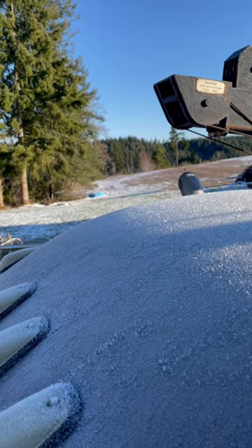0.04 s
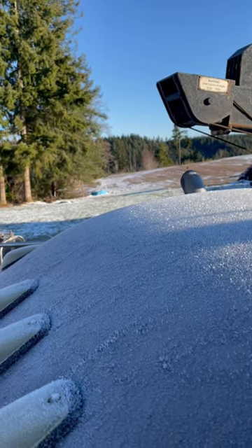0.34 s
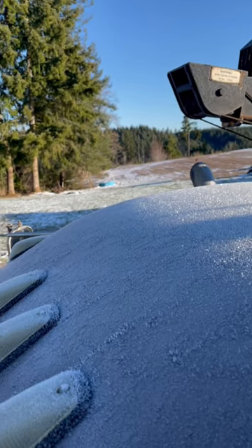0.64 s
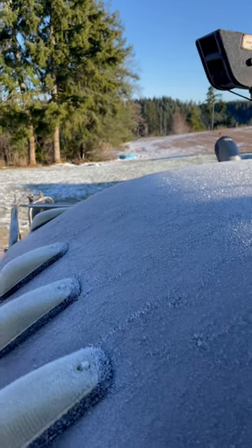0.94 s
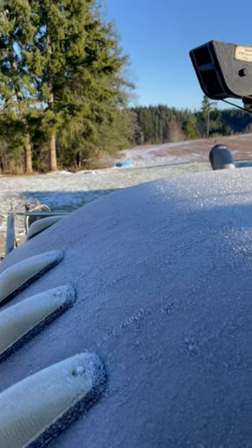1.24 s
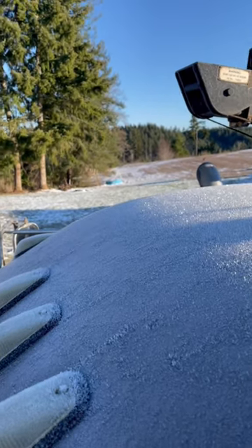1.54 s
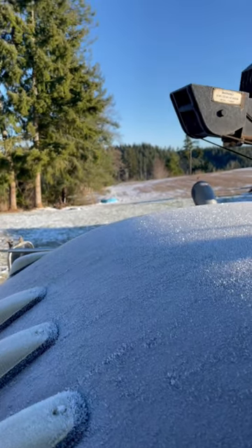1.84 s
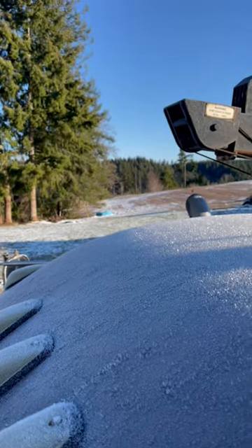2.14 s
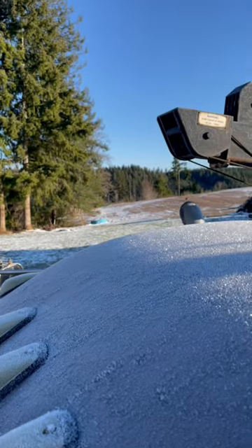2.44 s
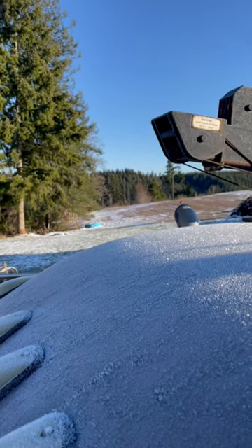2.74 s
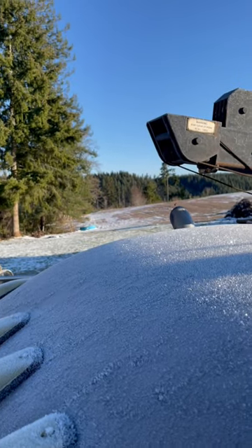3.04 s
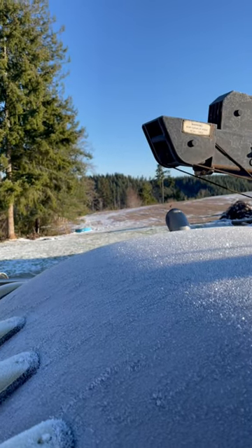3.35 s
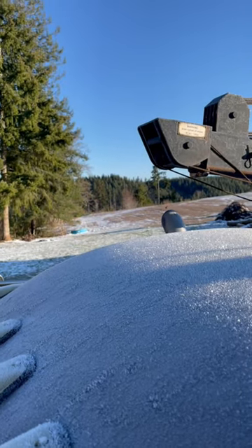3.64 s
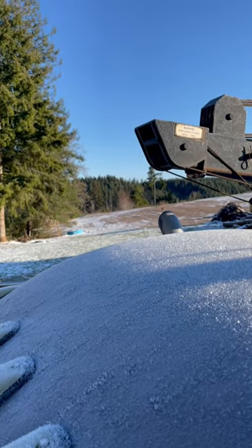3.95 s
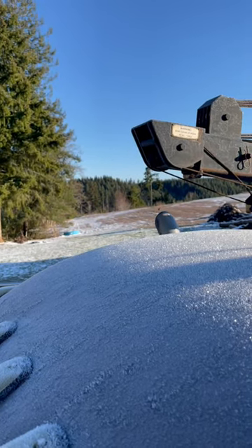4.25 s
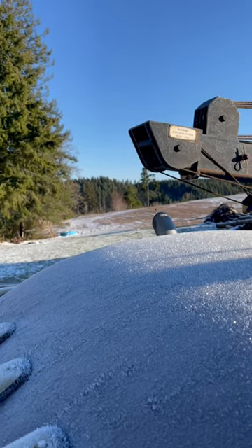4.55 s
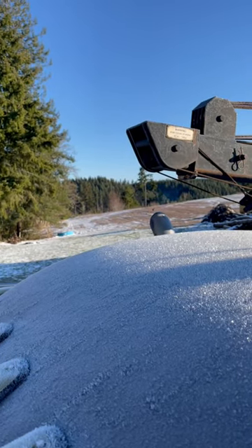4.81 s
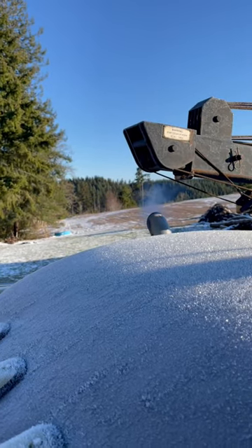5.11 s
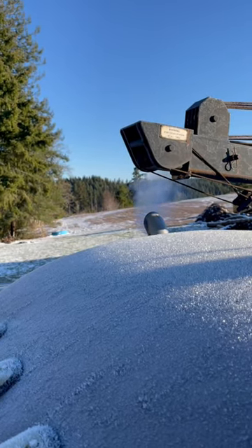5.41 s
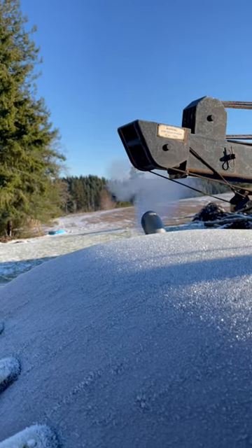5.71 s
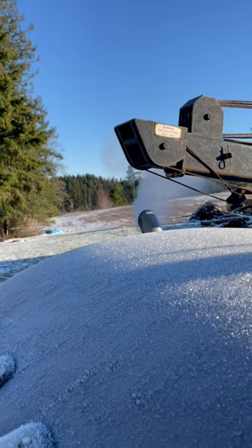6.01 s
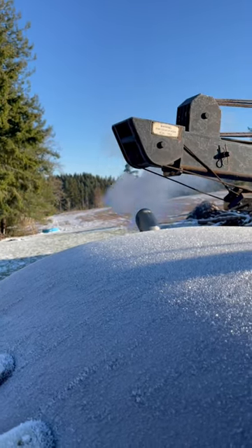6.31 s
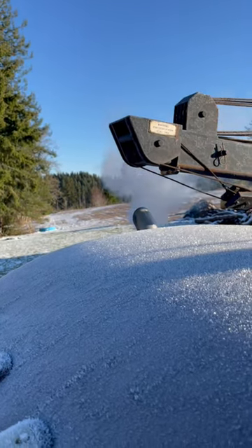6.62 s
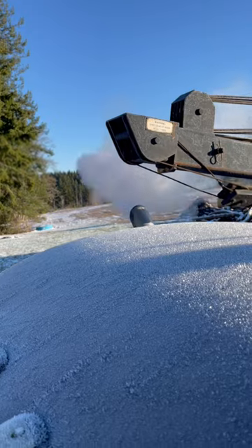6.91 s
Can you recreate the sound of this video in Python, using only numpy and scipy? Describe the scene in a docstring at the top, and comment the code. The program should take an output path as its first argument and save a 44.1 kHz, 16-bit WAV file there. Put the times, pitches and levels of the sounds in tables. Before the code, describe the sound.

Heard from just behind the hood outdoors, a starter motor turns over a big cold diesel, its whine dragging on each compression amid a metallic rattle and soft exhaust chuffs. The engine gives a few weak coughs midway and keeps cranking. Near the end it starts to catch, firing in irregular clusters of low booms, sharp knocks and short hisses as the starter speeds up and slows.

```python
"""Outdoors, behind the frosted hood of a heavy diesel that is being cranked from cold.
The starter gears whine and clatter, dragging on every compression, over the rumble of the exhaust stack.
A few lone cylinders fire around three seconds in. After five seconds come three bunches of booms,
as gas is shoved up the stack, with hard combustion knocks on the block and spits of hiss."""
import sys
import numpy as np
from scipy import signal
from scipy.fft import rfft, irfft
from scipy.io import wavfile
from scipy.ndimage import uniform_filter1d

SR = 44100
rng = np.random.default_rng(int(sys.argv[2]) if len(sys.argv) > 2 else 0)


def output_pcm(signal):
    """Save a mono or channel-first signal as 16-bit PCM at the path in sys.argv[1].

    Samples are clipped to [-1, 1] before scaling.
    """
    pcm = np.clip(np.atleast_2d(signal).T, -1, 1) * 32767
    wavfile.write(sys.argv[1], SR, np.round(pcm).astype(np.int16))


N = 316197
TIME, FREQS = np.arange(N) / SR, np.fft.rfftfreq(N, 1 / SR)
AGE = TIME[:SR // 2]  # seconds into a single hit

# The cranking rhythm. Each row: compression time in seconds, whine in dB, run-up tooth-mesh rate in Hz.
COMPRESSIONS = [(-.025, 5, 409), (0.095, 1.5, 408.6), (.222, -1.5, 409), (.346, 0, 411.5),
                (0.468, -4.5, 414.5), (.595, 0, 407.3), (.713, -2, 408), (0.846, 0.5, 404.6),
                (0.963, -3, 410.2), (1.096, -1.5, 404.5), (1.223, -3, 416.2), (1.346, 1, 406.4),
                (1.462, -1.5, 414.8), (1.59, 0, 408), (1.709, 0, 411.5), (1.826, -3, 411.4),
                (1.959, 1, 407.6), (2.086, -3, 413), (2.208, -1.5, 411.3), (2.329, -3.5, 414),
                (2.456, 1, 402.5), (2.576, -2.5, 408.4), (2.715, 3, 461), (2.812, 2.5, 458),
                (2.922, -4.5, 447), (3.03, 1, 438.4), (3.146, 2.5, 426.4), (3.275, 2, 449.8),
                (3.378, 2.5, 446.2), (3.494, -2, 441.2), (3.61, 1, 424.4), (3.726, 2.5, 415.5),
                (3.848, 0, 413.5), (3.973, 1, 406), (4.103, 1.5, 432), (4.222, -4.5, 420.8),
                (4.333, -4, 415), (4.456, 3.5, 408), (4.576, -1.5, 409.4), (4.709, -3, 434.5),
                (4.822, 4, 444.5), (4.935, -3, 446), (5.047, -1.5, 469.3), (5.148, 0.5, 466),
                (5.255, 4.5, 445), (5.365, -7, 479), (5.445, -9, 578.5), (5.528, 5, 552), (5.628, 2, 509.6),
                (5.741, 5, 453.5), (5.856, 1.5, 428), (5.969, 0, 413), (6.1, -2, 446.3), (6.181, 1.5, 564),
                (6.27, 7, 540), (6.373, 1.5, 490), (6.492, 2.5, 443.4), (6.61, -7.5, 432), (6.7, -16, 536),
                (6.772, -21, 592), (6.848, 5, 570), (6.94, 6, 560), (7.027, 9.5, 550), (7.12, 6, 530),
                (7.22, -6, 500)]
# The shape of one stroke. Each row: position from 0 to 1, cold tooth-mesh rate in Hz,
# weight of any extra speed, tooth force in dB, clatter in dB.
STROKE_SHAPE = [(0, 388.6, 0.12, -1.5, 2.5), (0.079, 371.7, 0.1, -0.5, 1.5), (.16, 347.5, 0.25, 1, 0.5),
                (0.281, 313, 0.45, -1.5, 2), (0.418, 303.9, 0.68, -4, 0), (0.56, 369.4, 1.65, -10, -0.5),
                (.68, 399.7, 1.25, -3, 0), (.79, 410.6, 0.95, -13.5, 0.5), (.88, 402.6, 0.62, 0.5, 0)]
# Gear overtones. Each row: multiple of the tooth-mesh rate, level in dB.
GEAR_OVERTONES = [(3, -52.5), (4, -55), (5, -57), (6, -56), (7, -62)]
# Each row: firing time in seconds, boom in dB, boom pitch in Hz, swell in seconds, gas rush in dB.
CYLINDER_FIRINGS = [(2.675, -21.5, 70.4, 0.032, -36.5), (2.86, -28, 78.57, 0.019, -56),
                    (3.32, -26, 71, 0.031, -45), (5.023, -25, 69.26, 0.023, -28.5),
                    (5.099, -25, 92, 0.018, -35), (5.341, -16.5, 90.6, 0.058, -20.5),
                    (5.432, -16, 55, 0.047, -25), (5.595, -22.5, 65.4, 0.026, -33.5),
                    (5.713, -25, 61.15, 0.037, -39), (6.088, -15, 65.8, 0.052, -22.5),
                    (6.148, -18.5, 94, 0.028, -25), (6.233, -26.5, 61.5, 0.061, -30),
                    (6.598, -13, 62.3, 0.041, -22), (6.715, -15.5, 74, 0.017, -27.5),
                    (6.772, -13, 68.1, 0.038, -25), (6.85, -32, 103.6, 0.018, -23.5),
                    (6.897, -20, 95.6, 0.012, -26), (6.94, -26, 89.9, 0.022, -43),
                    (7.041, -27.5, 66.8, 0.045, -43)]
# Each row: start in seconds, knock in dB, hiss in dB, swell in seconds.
HARD_KNOCKS = [(2.201, -41, -76, 0.0029), (2.78, -46, -66, 0.03), (2.888, -44, -62, 0.014),
               (3.26, -43, -68, 0.017), (3.365, -51, -74, .02), (4.703, -40, -70, 0.0038),
               (4.819, -37, -76, 0.003), (5.389, -30.5, -74, 0.012), (5.442, -53, -51, 0.01),
               (5.64, -44, -59, 0.013), (6.098, -34, -43, .0015), (6.133, -30.5, -64, 0.0098),
               (6.15, -50, -47, 0.014), (6.6413, -29, -34.5, 0.0008), (6.643, -25, -52, 0.0055),
               (6.689, -42, -49, 0.013), (6.711, -25.5, -62, 0.0092), (6.738, -35.5, -51, 0.015),
               (6.772, -24, -65, 0.0097), (6.822, -19, -38.5, 0.0045), (6.833, -28, -71, 0.011),
               (7.02, -40, -53, 0.015)]

# Resonances. Each row: centre in Hz, width in Hz, level in dB.
HOUSING_MODES = [(661, 28, 11), (303.4, 16, 4.5), (1126, 62, -4.5), (1765, 45, 2.5), (1910, 62, -1),
                 (2440, 96, -2.5)]  # flywheel housing
BLOCK_MODES = [(204.6, 86, -2), (666, 8.8, -2), (1158, 13.6, 6.5), (1800, 34, 2.5), (1927, 43, 5.5),
               (2084, 27, 2), (2455, 37, 3), (2740, 26, 5), (2800, 65, 2), (4140, 140, 0)]  # iron block and its covers
CLANK_MODES = [(1760, 350, -5), (2200, 290, -6.5), (3650, 250, 10.5), (5000, 270, -17)]  # short ring of knocked metal
STACK_MODES = [(54.5, 19, 2.5), (92.1, 12.4, -1.5), (143.3, 34, -11.5), (199.7, 6.2, -4)]  # exhaust pipe
MOUTH_MODES = [(279, 33, 11), (440, 84, 10.7), (664, 63, 6.3), (870, 73, 3.7)]  # mouth of the stack

# Noise colours. Each row: frequency in Hz, relative spectral density in dB.
CLATTER_EQ = [(90, -10.5), (170, 2), (250, -0.5), (320, 2.5), (430, 0.5), (540, -3.5), (700, 1),
              (1100, -4.5), (1400, -12), (1950, -12.5), (2550, -15.5), (2950, -21), (5400, -27),
              (6500, -35.5), (7400, -62.5), (11000, -68)]  # rattling gears
RUSH_EQ = [(30, -6.5), (80, 10.5), (160, 6), (300, -6), (600, -8), (1200, -18), (2400, -21.5),
           (3500, -34.5), (6000, -38.5), (9000, -70)]  # turbulent gas in the stack
BARK_EQ = [(120, -27), (280, -3.5), (800, -5.5), (1300, -23), (3000, -69)]  # gas tearing out of the mouth
KNOCK_EQ = [(300, -3.5), (1100, 1.5), (1700, 6.5), (2400, 6.5), (3100, -3), (3800, -14), (6000, -13.5),
            (8000, -44.5), (15000, -33)]  # hard knock
HISS_EQ = [(1500, -22), (3000, 1.5), (5500, 13.5), (7500, -26), (9200, 8), (11800, 1), (13500, -12.5),
           (16000, -11)]  # bright hiss

# Stereo width. Each row: frequency in Hz, likeness of left and right from -1 to 1.
STEREO_LIKENESS = [(100, 0.98), (200, 1), (400, 0.69), (600, 0.094), (1200, 0.1), (1900, 0.77),
                   (2800, -0.53), (4000, 0.091), (4500, 0.23), (5300, 0.33), (6500, -0.22), (11000, 0.26)]
# The whine reaches the left ear late. Each row: frequency in Hz, lag in radians.
LEFT_EAR_LAG = [(450, 0.51), (800, 0.97), (1200, 0.3), (1900, 0.11), (2500, 0.24)]
# The hood shades the machinery from the left ear. Each row: frequency in Hz, left minus right in dB.
HOOD_SHADE = [(150, -1.5), (400, -2), (680, -3.5), (790, -0.5), (1300, -2.5), (1900, 1), (2700, -2),
              (4100, 0.5), (7000, 1)]


def starter_whine(turns, force, effort, squeal, groan_db=-34, octave_db=-47, note_hz=791.8):
    """Meshing teeth groan; their octave sweeps through the housing's main note and sets it ringing."""
    angle = 2 * np.pi * turns
    teeth = amp(groan_db) * (1 + .2 * wander(55)) * np.sin(angle + .5 * wander(67))
    teeth += amp(octave_db) * effort * (1 + .12 * wander(59)) * np.sin(2 * angle)
    # overtones come and go as the pinion shifts in its backlash
    for multiple, db in GEAR_OVERTONES:
        teeth += amp(db + 2 * wander(33)) * np.sqrt(2) * np.sin(multiple * angle + .77 * wander(66))
    teeth = teeth * force + squeal
    main_note = amp(25) * ring([(note_hz, 39.6, 0)]) ** 2  # steep-sided: holds the whine on one pitch
    housing = 1 + ring(HOUSING_MODES) + main_note
    blur = amp(-22) * echoes(teeth, t60=.14)[0]  # reflections under the hood smear the glides
    right = rfft(teeth + blur) * housing
    left = right * np.exp(-1j * curve(LEFT_EAR_LAG))
    return irfft(np.array([left, right]), N)


def gear_squeal(turns, stroke, extra_hz, best_extra_hz=42, range_hz=22):
    """A little above cold speed, the gears sing two clean overtones in the run-up to each compression."""
    run_up = stroke_pulse(stroke, at=.79, width=.13)
    sweet_spot = np.exp(-((extra_hz - best_extra_hz) / range_hz) ** 2)
    tones = sum(amp(db) * np.sin(multiple * 2 * np.pi * turns + .2 * wander(40))
                for multiple, db in ((4, -45.5), (5, -48)))
    return run_up * sweet_spot * tones


def gear_clatter(turns, strength, db=-34, ticks_per_s=900, tick_s=.0042, wash=.69, top_hz=12000):
    """Gear backlash and valve gear tick against the iron block, over a wash of noise."""
    ticks = (rng.random(N) < ticks_per_s / SR) * amp(3.2 * np.minimum(rng.exponential(1, N), 4)) ** 2
    power = signal.lfilter([1], [1, -np.exp(-1 / (tick_s * SR))], ticks)
    tooth_buzz = 1 + .1 * np.cos(2 * np.pi * turns)
    grains = rng.standard_normal((2, N)) * np.sqrt(power / power.mean() + wash) * tooth_buzz
    # reflections under the hood give a ribbed, metallic colour that slowly shifts
    blend = np.array([wander(5) for _ in range(3)])
    blend /= np.linalg.norm(blend, axis=0)
    grains = grains + .8 * sum(share * echoes(grains, t60=.094) for share in blend)
    flicker = amp(.5 * wander(21))
    rattle = amp(db) * colour(grains, CLATTER_EQ, BLOCK_MODES) * strength * flicker
    return irfft(rfft(rattle) / (1 + (FREQS / top_hz) ** 16), N)


def cranking_rhythm(run_up=.2464, cold_top_hz=410):
    """The starter's pace: running stroke count, whine gain, and mesh Hz gained over the cold crank."""
    times, whine_db, top_hz = np.transpose(COMPRESSIONS)
    count = np.arange(len(times))
    stroke = np.interp(TIME, times, count)
    effort = amp(np.interp(stroke, count, whine_db))
    extra_hz = np.interp(stroke + run_up, count, top_hz) - cold_top_hz
    return stroke, effort, extra_hz


def crank(stroke, extra_hz, flutter=.004, slack_db=-4, overrun_hz=80):
    """Compression brakes the crank, expansion frees it: gives mesh turns, tooth force, clatter gain."""
    position, *columns = np.transpose(STROKE_SHAPE)
    cold_hz, give, force_db, clatter_db = (
        uniform_filter1d(np.interp(stroke, position, column, period=1), size=300) for column in columns)
    mesh_hz = (cold_hz + give * extra_hz) * (1 + flutter * wander(41))
    # the gears fall slack at ignition, just before the exhaust opens
    slack = amp(slack_db * np.tanh(firing_swells(rise_s=.0091, lead_s=.046) / .13))
    # the teeth unload as the engine outruns the starter
    grip = 1 / np.sqrt(1 + (extra_hz / overrun_hz) ** 4)
    return np.cumsum(mesh_hz) / SR, amp(force_db) * slack * grip, amp(clatter_db) * slack


def exhaust_booms(sag=.055, tail_db=-11):
    """Each firing shoves gas up the stack: a boom sagging in pitch, a turbulent rush, a ragged bark."""
    boom, rush, bark = np.zeros((3, N))
    for start, boom_db, hz, rise_s, rush_db in CYLINDER_FIRINGS:
        angle = 2 * np.pi * hz * AGE * (1 - sag * np.tanh(AGE / .073))
        # the pipe's next resonance rings along, and the steepening pressure front adds the octave
        wave = np.sin(angle) + amp(-13) * np.sin(1.55 * angle) + .1 * np.sin(2 * angle)
        add(boom, start, amp(boom_db) * swell(rise_s) ** 1.56 * wave)
        add(rush, start, amp(rush_db) * swell(rise_s=.03))
        crests = (.5 + .5 * np.sin(angle)) ** 2  # gas tears out of the mouth on each crest
        add(bark, start, amp(rush_db + 1.5) * swell(rise_s=.018) * crests)
    gas = boom + rush * noise(RUSH_EQ) + bark * noise(BARK_EQ, MOUTH_MODES)
    return gas + amp(tail_db) * echoes(gas.mean(0), t60=.89)[0]


def knocks_and_hiss(stroke, loose, soft_db=-51, jet_db=-68, gust_db=-47, tail_db=-8):
    """Late-igniting fuel cracks against the block, and gas spits from the outlet."""
    blows, spits = np.zeros((2, N))
    for start, knock_db, hiss_db, rise_s in HARD_KNOCKS:
        burst = swell(rise_s) ** 3
        add(blows, start, amp(knock_db) * burst)
        add(spits, start, amp(hiss_db) * burst)
    # once the engine is loose, every stroke knocks softly
    blows += amp(soft_db) * loose * stroke_pulse(stroke, at=1, width=.37)
    knock = blows * noise(KNOCK_EQ, CLANK_MODES)
    # the outlet hisses throughout, and harder in the wake of each firing
    jet = amp(jet_db) + amp(gust_db) * firing_swells(rise_s=.062)
    sputter = amp(1.5 * wander(30))
    hiss = (spits + jet * sputter) * noise(HISS_EQ)
    return knock + hiss + amp(tail_db) * echoes(knock, t60=.22)


def stack_rumble(strength, loose, db=-35.5, loose_db=3, low_hz=42, top_hz=350):
    """Unburnt air leaves in soft chuffs that ring the stack, louder once the engine loosens."""
    chuffs = rng.standard_normal(N) * strength ** .2
    band = 1 / (1 + (low_hz / (FREQS + 1)) ** 6) / (1 + (FREQS / top_hz) ** 4)
    air = irfft(rfft(chuffs) * ring(STACK_MODES) * band, N)
    # every stroke pumps about the same amount of air
    air /= np.sqrt(uniform_filter1d(air ** 2, size=6000) + 1e-12)
    return amp(db + loose_db * loose) * air


def echoes(x, t60):
    """A tail of scattered reflections, different in each ear, falling 60 dB in t60 seconds."""
    t = TIME[:SR]
    taps = (rng.standard_normal((2, SR)) * amp(-60 * t / t60))[:, t < t60]
    return signal.oaconvolve(np.atleast_2d(x), taps / np.linalg.norm(taps[0]), axes=1)[:, :N]


def firing_swells(rise_s, lead_s=0.):
    """A swell for every firing, as strong as its boom, starting lead_s ahead of it."""
    total = np.zeros(N)
    for start, boom_db, *_ in CYLINDER_FIRINGS:
        add(total, start - lead_s, amp(boom_db) * swell(rise_s))
    return total


def stroke_pulse(stroke, at, width):
    """A bell-shaped envelope once a stroke; position and width are fractions of the stroke."""
    return np.exp(-(((stroke - at + .5) % 1 - .5) / width) ** 2)


def swell(rise_s):
    """An envelope that peaks at 1 after the rise time and dies away."""
    u = AGE / rise_s
    return u * np.exp(1 - np.minimum(u, 60))


def wander(rate_hz):
    """Smooth random modulation of rms 1."""
    coarse = TIME[::100]
    hz = np.fft.rfftfreq(len(coarse), coarse[1])
    slow = irfft(rfft(rng.standard_normal(len(coarse))) / (1 + (hz / rate_hz) ** 4), len(coarse))
    return np.interp(TIME, coarse, unit(slow))


def noise(eq, modes=()):
    """A steady bed of coloured stereo noise."""
    return colour(rng.standard_normal((2, N)), eq, modes)


def colour(pair, eq, modes):
    """Shapes two unrelated signals with EQ and resonances into stereo of rms 1, the bass centred."""
    peaks = np.sqrt(1 + sum(abs(ring([mode])) ** 2 for mode in modes))
    a, b = rfft(pair) * amp(curve(eq)) * peaks
    likeness = curve(STEREO_LIKENESS)
    mid, side = a * np.sqrt(1 + likeness), b * np.sqrt(1 - likeness)
    return unit(irfft(np.array([mid + side, mid - side]), N))


def ring(modes):
    """The frequency response of a bank of resonances."""
    return sum(amp(db) / (1 + 2j * (FREQS - hz) / width) for hz, width, db in modes)


def curve(points):
    """Joins breakpoints across the spectrum on a log-frequency axis."""
    hz, value = np.transpose(points)
    return np.interp(np.log(FREQS + 1), np.log(hz + 1), value)


def add(mix, start, sound):
    """Drops a hit into the mix at a start time in seconds."""
    part = mix[max(round(start * SR), 0):][:len(sound)]
    part += sound[:len(part)]


def amp(db):
    """Decibels to gain."""
    return 10 ** (np.asarray(db) / 20)


def unit(x):
    """Scales to rms 1."""
    return x / np.sqrt(np.mean(x ** 2) + 1e-20)


def scene():
    """Starter and engine share one cranking rhythm; the machinery sits a little to the right."""
    stroke, effort, extra_hz = cranking_rhythm()
    turns, force, strength = crank(stroke, extra_hz)
    loose = np.tanh(np.maximum(extra_hz, 0) / 40)  # 0 while cold and stiff, near 1 as firings drive it
    squeal = gear_squeal(turns, stroke, extra_hz)
    gears = starter_whine(turns, force, effort, squeal) + gear_clatter(turns, strength)
    shade = amp(curve(HOOD_SHADE) * np.array([[.5], [-.5]]))
    machinery = irfft(rfft(gears) * shade, N)
    return machinery + stack_rumble(strength, loose) + exhaust_booms() + knocks_and_hiss(stroke, loose)


def record(dry, low_hz=36, top_hz=15800):
    """The microphone drops the deepest bass; a steep high cut takes off the very top."""
    thinned = signal.sosfilt(signal.butter(2, low_hz, "highpass", fs=SR, output="sos"), dry)
    high_cut = signal.firwin(511, top_hz, window=("kaiser", 9), fs=SR)
    return signal.oaconvolve(thinned, high_cut[None], "same")


dry = scene()
out = record(dry)
output_pcm(out)
```